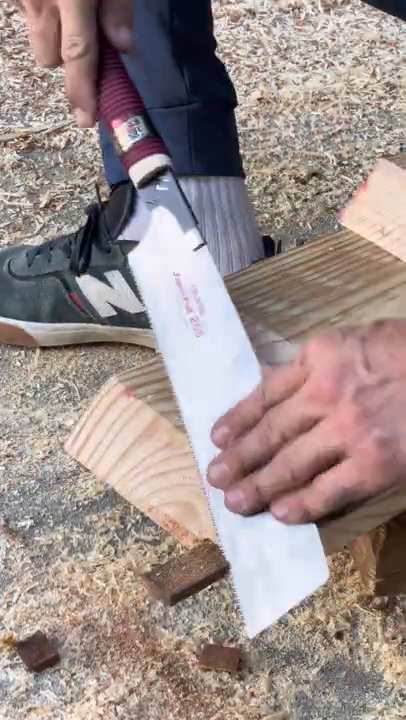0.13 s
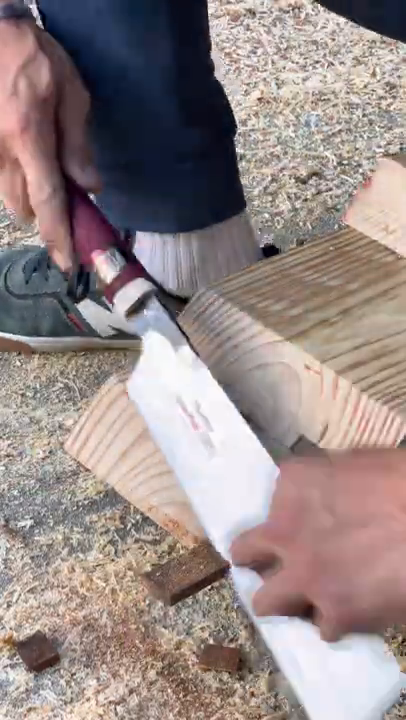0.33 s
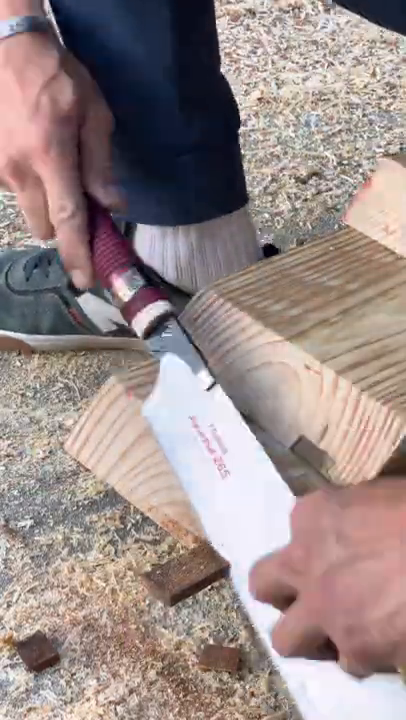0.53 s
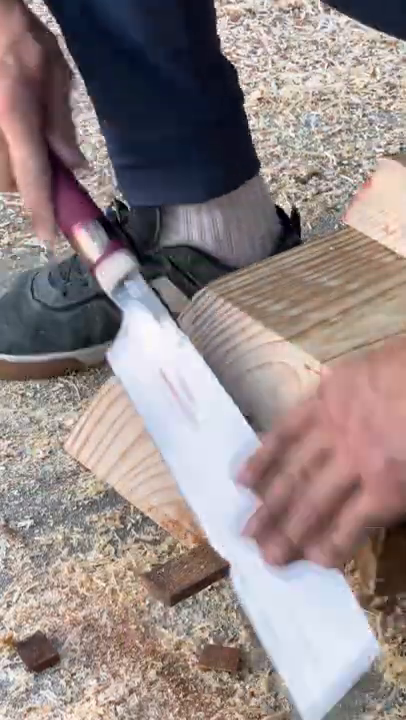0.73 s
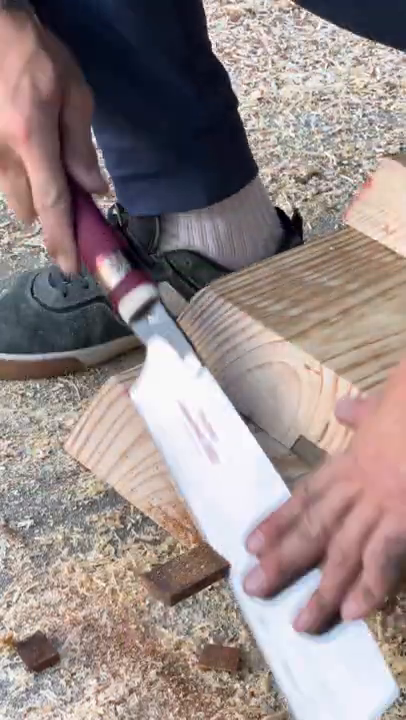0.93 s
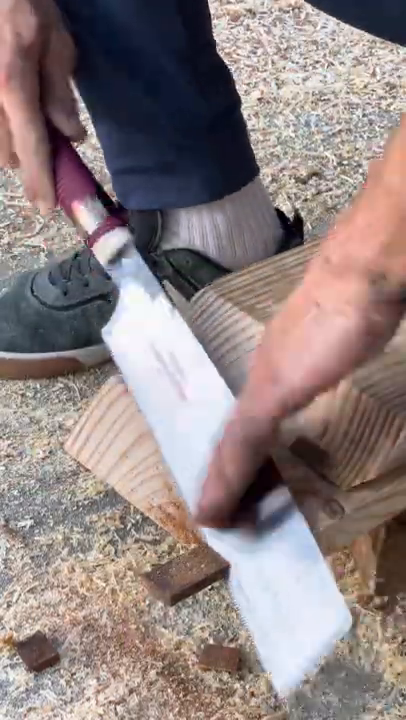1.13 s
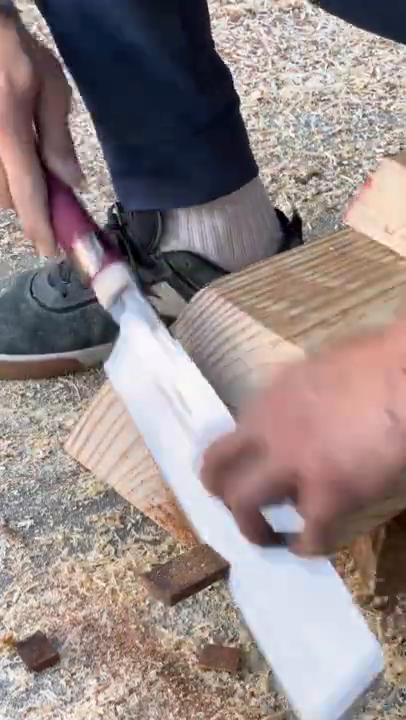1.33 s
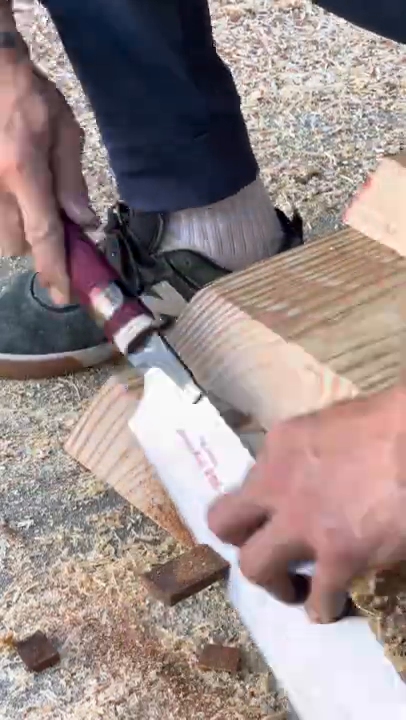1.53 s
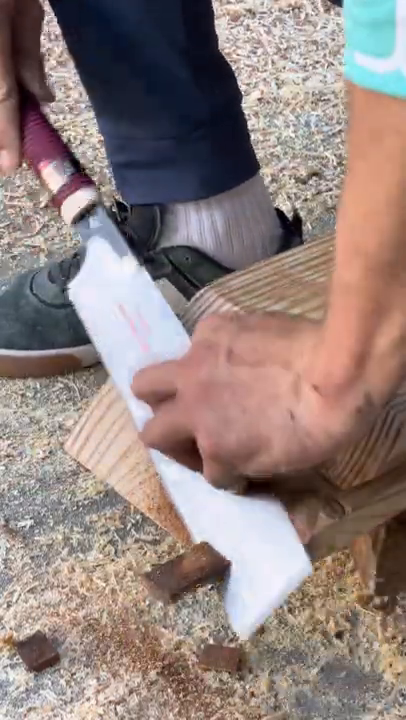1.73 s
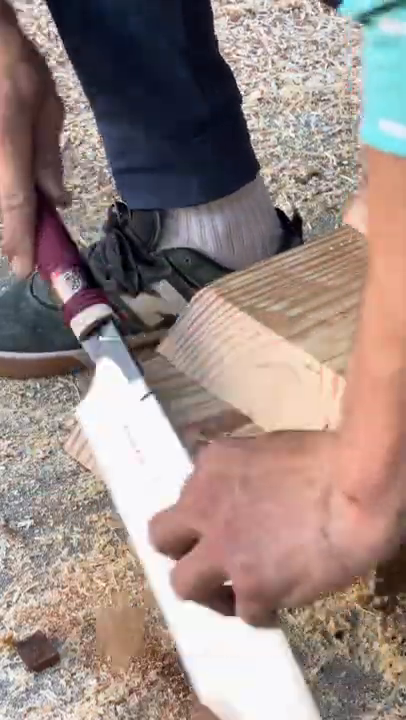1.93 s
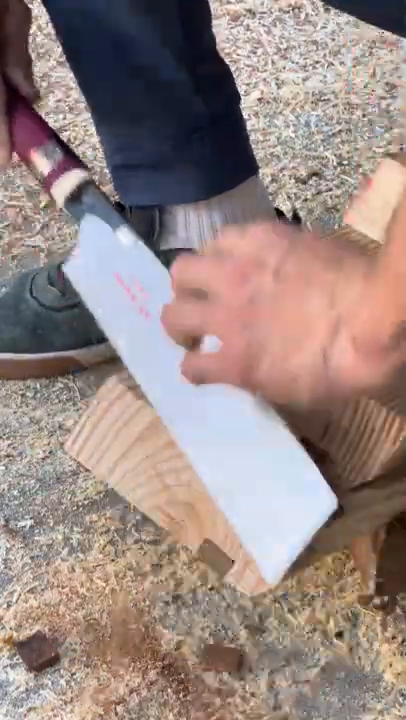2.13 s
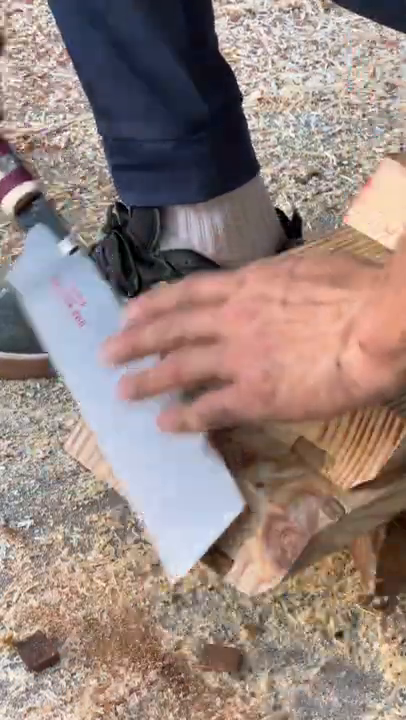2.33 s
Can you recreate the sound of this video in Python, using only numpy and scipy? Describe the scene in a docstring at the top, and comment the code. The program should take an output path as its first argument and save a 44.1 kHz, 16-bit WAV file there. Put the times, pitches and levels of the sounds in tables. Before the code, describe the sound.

Hand saw rasping through wood at sped-up pace, then last slow scrapes, knocks and quiet outdoor hum

```python
"""A fine pull saw rasps through a wooden block outdoors at 5.5 times its speed, quick and high, over raised yard hum.
Early light strokes squeak; in every stroke, random tooth catches make the rasp and ring blade and wood.
At 1.717 s time drops to its natural pace: the last teeth tear free in coarse slips that ring lower modes.
Offcut and blade knock about as short noise bursts, then the blade is set down and its modes rattle.
Shaped noise and two mains tones leave the low hum of the yard, with thin falling whistles far off."""
import sys
import numpy as np
from scipy import signal
from scipy.fft import rfft, irfft
from scipy.io import wavfile

SR = 44100
rng = np.random.default_rng(int(sys.argv[2]) if len(sys.argv) > 2 else 0)


def int16_out(signal):
    """Quantize to a 16-bit WAV file."""
    q = np.round(np.clip(np.atleast_2d(signal).T, -1, 1) * 32767)
    wavfile.write(sys.argv[1], SR, q.astype(np.int16))


N = 110250
T = np.arange(N) / SR   # s

# Half strokes, before the layer gains: [start t/s, length t/s, peak place 0-1, rasp level/dB,
# blade ring level/dB re rasp, wood level/dB re rasp]
HALF_STROKES = [(0.044, 0.14, 0.47, -53.5, -24, -13), (0.16, 0.029, 0.5, -53, 8, -3),
                (0.216, 0.016, 0.4, -42, 3.5, 3), (0.2776, 0.035, 0.24, -47, -4, 13.5),
                (0.331, 0.021, 0.54, -36.5, 4, -1), (0.358, 0.019, 0.5, -37.5, 4.5, -14),
                (0.399, 0.035, 0.85, -41.5, 2, 3.0), (0.4535, 0.026, 0.3, -35.5, 5.5, -8),
                (0.4937, 0.038, 1, -43, 1, 2), (0.557, 0.012, 0.76, -31.5, 4, -9.5),
                (0.6026, 0.021, 0.98, -40.5, 0, 6), (0.6467, 0.024, 0.54, -34.5, 5.5, -9.5),
                (0.6813, 0.033, 0.84, -36, 0, -1), (0.73, 0.025, 0.66, -36.5, 6.5, -6.5),
                (0.77, 0.026, 0.33, -38, 3, 0.5), (0.8067, 0.024, 1, -32, 4, -11.5),
                (0.8486, 0.02, 0.55, -34, 1, -2), (0.886, 0.016, 1, -31.5, 4.5, -5.5),
                (0.921, 0.019, 0.6, -34.5, -2, -0.5), (0.9534, 0.022, 0.6, -34.5, 8.5, -1),
                (0.9916, 0.02, 1, -36, 3, 2.5), (1.027, 0.02, 0.9, -31.5, 8.5, -8),
                (1.066, 0.028, 0, -39.5, 5, 6), (1.1006, 0.019, 0.62, -32, 7, -5.5),
                (1.139, 0.037, 0, -45.5, 6, 0.5), (1.179, 0.019, 0.44, -36, 13.5, -1.5),
                (1.224, 0.018, 0.3, -40.5, 10, 3.5), (1.2564, 0.024, 0.57, -35, 13.5, 0.5),
                (1.2977, 0.018, 0.45, -35, 2, -1), (1.332, 0.019, 0.8, -33.5, 6.5, -4.5),
                (1.373, 0.019, 0.45, -36.5, -1, -3), (1.403, 0.026, 0.53, -33.5, 4, -1.5),
                (1.4426, 0.019, 0.4, -36, -1, 0.5), (1.477, 0.017, 1, -29, 4, -9),
                (1.5133, 0.021, 0.46, -36.5, 7.5, -3.5), (1.549, 0.021, 0.76, -35.5, 8.5, 0),
                (1.583, 0.023, 0.82, -32.5, 2, -3.5), (1.624, 0.018, 0.95, -34.5, 8, -4.5),
                (1.6565, 0.027, 0.55, -31, -1, -2.5), (1.7067, 0.0061, 0.2, -34, 10, -2)]
# Squeaks of the blade: [start t/s, length t/s, f/Hz, base level/dB]
BLADE_SQUEAKS = [(0.162, 0.027, 4560, -50), (0.211, 0.027, 3196, -43), (0.213, 0.038, 4410, -47),
                 (0.293, 0.014, 1710, -57)]
# Colour of the rasp: [f/Hz, relative level/dB]
RASP_COLOUR = [(4000, 0), (5500, -1.5), (7000, 0), (9000, -10), (11000, 2), (13000, -4), (16000, -4)]
# Resonances of blade and wood, before the pace factor:
# [f/Hz, width f/Hz, relative level/dB when fast, relative level/dB at natural pace]
BLADE_MODES = [(1448, 30, 8, -14), (1496, 33, 9, 8), (1655, 105, 7, 1), (2020, 15, -19, -2),
               (2550, 25, -15, 1.5), (2680, 64.5, -23.5, -7), (2875, 95, 0, 5.5)]
WOOD_MODES = [(428, 27, -10, -8.5), (491, 6.2, -0.5, -6), (546.8, 16, 2, -7), (619, 19, 5, -4),
              (650, 54, 1.5, -16), (809, 70, 6, -15)]
# Resonances of the whole block, before the pace factor: [f/Hz, width f/Hz, relative level/dB when fast]
BLOCK_MODES = [(178.4, 15, 3), (227.2, 6.8, -2.5), (302, 43, -5), (340.5, 9.8, 0), (408, 51, 2)]
# Last scraping, before the layer gains: [t/s, ringing level/dB, hiss level/dB]
LAST_LEVELS = [(1.718,-40.5,-49),(1.725,-34,-34.5),(1.74,-33,-35),(1.767,-34.5,-34),(1.778,-36.5,-36),(1.822,-49,-59.5),(1.838,-48,-31.5),(1.852,-39.5,-39),(1.882,-39.5,-44.5),(1.906,-37,-52),(1.94,-59,-63),(1.968,-39.5,-49),(1.99,-57,-87)]
# Hard slips as the last teeth tear free, added to the scraping: [t/s, level/dB re scraping]
LAST_SLIPS = [(1.724, 7), (1.738, 4.5), (1.746, 0), (1.754, 1), (1.763, 0.5)]
# Colours of the last scraping's broad noise and dry hiss: [f/Hz, relative level/dB]
LAST_BROAD_COLOUR = [(300,0),(640,-2),(1300,14),(2730,11),(4500,-4)]
LAST_HISS_COLOUR = [(3500,-6.5),(6300,1.5),(8600,-15),(12000,-3.5),(16000,-1)]
# Sharp ticks, before the band filter: [t/s, burst level/dB, centre f/Hz, 60 dB decay t/s]
SHARP_TICKS = [(1.8462, -16, 1200, 0.045), (1.8894, -16, 3020, 0.023), (1.9635, -38, 2230, 0.02),
               (2.1384, -22.5, 4350, 0.0058)]
# The blade is set down: [t/s, rattle level/dB, 60 dB decay t/s]
SET_DOWN_RATTLES = [(2.1797, -31, 0.11), (2.2165, -31.5, 0.064)]
# Modes of the set-down blade: [f/Hz, relative level/dB, 60 dB decay t/s]
SET_DOWN_BLADE_MODES = [(1107, -5.5, 0.2), (1222, -2, 0.081), (1705, 0.5, 0.022), (2790, -3, 0.033),
                        (3550, -5, 0.042), (4740, -0.5, 0.016), (5250, -3, 0.074), (5470, -3, 0.098)]
# Lower bands of the fast part: [t/s, bass level/dB, middle level/dB, middle's upper edge f/Hz]
LOWER_BAND_LEVELS = [(0,-4,-14,3300),(.035,-10,-36,3320),(.12,-5.5,-14.5,2840),(.15,-18,-24,3280),(.32,-8,-32.5,3230),(.39,-2,-25,700),(.5,2,-1,590),(.545,-16,-24,2350),(.575,-6,-21,2610),(.605,-29,-27,850),(.635,-17,-2,470),(.67,3,25,443)]
# Colours of the fast yard's low noise, middle noise and air: [f/Hz, relative level/dB]
FAST_LOW_COLOUR = [(60, -53), (130, -28.5), (200, -12.5), (260, -6), (330, -3.5), (450, 1.5), (600, -5.5)]
FAST_MID_COLOUR = [(450, -5), (600, 4), (1000, 2), (1500, -1), (2500, -4)]
FAST_AIR_COLOUR = [(1500, -12), (3000, 3), (6000, -5), (10000, -6), (16000, -11)]
# Swell of the fast air: [t/s, level/dB]
FAST_AIR_LEVEL = [(0, -44), (0.038, -67), (.3, -60), (.7, -50.5)]
# Yard noise at natural pace, before waver: [t/s, bass level/dB, middle level/dB]
YARD_LEVELS = [(1.715,-54,-52.5),(1.75,-50,-39.5),(2.0,-44,-51.5),(2.25,-45,-51.5),(2.33,-62.5,-53),(2.42,-54,-64.5),(2.5,-49.5,-65.5)]
# Colours of the natural yard's bass, middle and air: [f/Hz, relative level/dB]
YARD_BASS_COLOUR = [(20, -34), (40, -14), (60, 1), (120, -3), (170, -23)]
YARD_MID_COLOUR = [(130, 6), (200, 0.5), (500, -3.5), (1000, -9), (2000, -20), (3000, -69)]
AIR_COLOUR = [(1500, 5.5), (3000, 5), (5000, 0), (7500, 1.5), (9000, -13), (14000, -5.5), (16000, -20)]
# Thin whistles far off: [start t/s, end t/s, first f/Hz, last f/Hz, base level/dB]
FAR_WHISTLES = [(1.74, 2.147, 3450, 3220, -64), (2.28, 2.613, 3830, 3460, -64.5)]
# Mains tones, before pace factor and waver:
# [f/Hz, level/dB re low yard level when fast, level/dB re yard bass level at natural pace]
MAINS_TONES = [(59.17, -1.5, -3.5), (119.65, 3, -5.5)]
# Phase of left over right: [f/Hz, phase/rad]
STEREO_PHASE = [(100,0.09),(600,-0.52),(2500,-0.24),(3200,0.3),(3700,-0.97),(4100,0.83),(5900,-0.48),(15200,0.17)]
# Level of the stereo difference: [f/Hz, level/dB re middle]
SIDE_LEVEL = [(50, -14), (150, -18.5), (500, -23), (1200, -22), (5000, -7), (9000, -20.5), (14000, -27)]

SPEED_UP, NATURAL_PACE, NATURAL_FROM_S = 5.5, 0.98, 1.717
EDGE_S, STROKE_SHAPE = 0.0041, 1.02
TEETH_PER_S, TEETH_SPREAD_DB, FLUTTER_DB = 9000, 3.15, 0.5
RASP_EDGES_HZ, RASP_PATCH_DB = np.geomspace(5200, 14000, num=6), 3.5   # bands swell on their own
RASP_DB, BLADE_DB, WOOD_DB, BLOCK_DB = -3, -9.5, -1, -7
SQUEAK_WIDTH_HZ = 84
SLIP_T60_S, SLIP_CRACK_DB = 0.038, 10
BLADE_FREE_S, LATE_RING_DB = 1.772, -8.5   # blade leaves the cut; later scraping rings it less
UPPER_FROM_HZ, UPPER_FIRST_DB, UPPER_FREE_DB = 2330, 7.5, -9.5
LAST_TEETH_PER_S, LAST_SPREAD_DB, LAST_BROAD_DB = 3300, 2.4, -3
TICK_SNAP_DB, TICK_BAND_RATIO = 11, 2.2   # first instant over the burst that follows
SET_DOWN_RING_DB = -27
BASS_SPLIT_HZ, EDGE_STEEPNESS = 437, 2.2
FAST_LOW_DB, FAST_MID_DB, YARD_BASS_DB, AIR_DB = -52.5, -50, -3.5, -59.5
WHISTLE_WIDTH_HZ, WHISTLE_STEADY, TRILL_HZ, TRILL_DEPTH = 50, 1.6, 150, 1
HUM_WAVER_DB = 1.2
SIDE_WANDER_PER_S, CUTOFF_HZ = 110, 15900


def fast_strokes():
    """Each half stroke swells and dies with the blade's speed; its catches rasp and ring blade and wood."""
    levels = np.zeros((3, N))
    for start, length, lean, db, *relative in HALF_STROKES:
        end = min(start + length + EDGE_S, NATURAL_FROM_S + EDGE_S)
        peak = start + np.clip(lean, .1, .9) * length
        phase = np.interp(T, [start - EDGE_S, peak, end], [0, .5, 1])
        layer_gains = from_db(db + np.array([0, *relative]))[:, None]
        levels += np.sin(np.pi * phase) ** STROKE_SHAPE * layer_gains
    levels *= from_db(FLUTTER_DB * drift(150)) * (T < NATURAL_FROM_S)
    rasp_level, blade_level, wood_level = levels
    catches = teeth(TEETH_PER_S, TEETH_SPREAD_DB)
    patches = bands(colour(catches, RASP_COLOUR), RASP_EDGES_HZ)
    rasp = rasp_level * sum(from_db(RASP_PATCH_DB * drift(33)) * patch for patch in patches)
    blade = body(blade_level, catches, BLADE_MODES, SPEED_UP, column=2)
    wood = body(wood_level, catches, WOOD_MODES, SPEED_UP, column=2)
    block = body(wood_level, catches, BLOCK_MODES, SPEED_UP, column=2)
    return (from_db(RASP_DB) * rasp + from_db(BLADE_DB) * blade
            + from_db(WOOD_DB) * wood + from_db(BLOCK_DB) * block)


def squeaks():
    """Early light strokes squeak in narrow bands: tones with randomly drifting amplitude and phase."""
    out = np.zeros(N)
    for start, length, hz, db in BLADE_SQUEAKS:
        swell = np.sin(np.pi * np.interp(T, [start, start + length], [0, 1])).clip(0)
        out += from_db(db) * swell * narrow_band(2 * np.pi * hz * T, 1, SQUEAK_WIDTH_HZ)
    return out


def last_scrape():
    """Coarse slips ring blade and wood at their own pitch, over a dry hiss; the upper modes lead and fade."""
    ring, hiss = from_db(in_time(LAST_LEVELS, outside=-120))
    ring = ring * (1 + sum(decay(s, db, SLIP_T60_S) for s, db in LAST_SLIPS))
    catches = teeth(LAST_TEETH_PER_S * from_db(1.5 * drift(130)), LAST_SPREAD_DB)
    catches[(np.array(LAST_SLIPS)[:, 0] * SR).astype(int) + 1] = from_db(SLIP_CRACK_DB)
    struck = ring * from_db(LATE_RING_DB * (T > BLADE_FREE_S))
    ringing = body(struck, catches, BLADE_MODES + WOOD_MODES, NATURAL_PACE, column=3, waver_db=1.5)
    low, high = bands(ringing, [UPPER_FROM_HZ])
    upper_db = np.interp(T, [NATURAL_FROM_S, BLADE_FREE_S], [UPPER_FIRST_DB, UPPER_FREE_DB])
    broad = from_db(LAST_BROAD_DB) * ring * colour(catches, LAST_BROAD_COLOUR)
    dry_hiss = hiss * colour(rms_one(catches) + 0.5 * noise(), LAST_HISS_COLOUR)
    return low + from_db(upper_db) * high + broad + dry_hiss


def knocks():
    """Ticks are short bright bursts; setting the blade down rattles its modes."""
    out, rattle = np.zeros(N), np.zeros(N)
    for s, db, hz, t60 in SHARP_TICKS:
        burst = noise() * decay(s, db, t60)
        burst[int(s * SR) + 1] = from_db(db + TICK_SNAP_DB)
        out += band_pass(burst, hz / TICK_BAND_RATIO, hz * TICK_BAND_RATIO)
    for s, db, t60 in SET_DOWN_RATTLES:
        rattle += rms_one(teeth(LAST_TEETH_PER_S, LAST_SPREAD_DB)) * decay(s, db, t60)
    out += band_pass(rattle, 500, 12000)
    for hz, db, t60 in SET_DOWN_BLADE_MODES:
        r, w = from_db(-60 / (t60 * SR)), 2 * np.pi * hz / SR
        ring = signal.lfilter([0, np.sin(w)], [1, -2 * r * np.cos(w), r * r], rattle + 1e-18)
        out += from_db(db + SET_DOWN_RING_DB) * ring
    return out


def lower_bands(x):
    """Sets the level of the bass and of the middle up to a sliding edge."""
    low_db, mid_db, edge_hz = in_time(LOWER_BAND_LEVELS)
    edges = np.geomspace(BASS_SPLIT_HZ, 4000, 11)
    low, *middle, top = bands(x, edges)
    out = from_db(low_db) * low + top
    for hz, part in zip(np.sqrt(edges[1:] * edges[:-1]), middle):
        share = np.clip(.5 + EDGE_STEEPNESS * np.log2(edge_hz / hz), 0, 1)
        out += from_db(mid_db * share) * part
    return out


def fast_yard():
    """Distant traffic-like noise and mains hum, raised in pitch."""
    low = colour(noise(), FAST_LOW_COLOUR) + hum(SPEED_UP, column=1)
    return from_db(FAST_LOW_DB) * low + from_db(FAST_MID_DB) * colour(noise(), FAST_MID_COLOUR)


def fast_air():
    """Thin open-air hiss, raised in pitch, from shaped noise."""
    return from_db(in_time(FAST_AIR_LEVEL)[0]) * colour(noise(), FAST_AIR_COLOUR)


def yard():
    """Noise and hum at natural pace, wavering together, under steady air hiss and far whistles."""
    bass_level, mid_level = from_db(in_time(YARD_LEVELS))
    bass = from_db(YARD_BASS_DB) * colour(noise(), YARD_BASS_COLOUR) + hum(NATURAL_PACE, column=2)
    ground = bass_level * bass + mid_level * colour(noise(), YARD_MID_COLOUR)
    air = from_db(AIR_DB) * colour(noise(), AIR_COLOUR)
    return from_db(1.26 * drift(8.8)) * ground + air + whistles()


def whistles():
    """Thin falling tones, blurred into narrow bands and trilled in level."""
    out = np.zeros(N)
    trill = 1 + TRILL_DEPTH * np.sin(2 * np.pi * TRILL_HZ * T)
    for start, end, from_hz, to_hz, db in FAR_WHISTLES:
        swell = np.sin(np.pi * np.interp(T, [start, end], [0, 1])).clip(0) ** 0.4
        turn = 2 * np.pi * np.cumsum(np.interp(T, [start, end], [from_hz, to_hz])) / SR
        out += from_db(db) * swell * trill * narrow_band(turn, WHISTLE_STEADY, WHISTLE_WIDTH_HZ)
    return out


def hum(speed, column):
    """Two mains tones whose level wavers."""
    out = np.zeros(N)
    for row in MAINS_TONES:
        level = from_db(row[column] + HUM_WAVER_DB * drift(1.06 * speed))
        out += level * np.sin(2 * np.pi * row[0] * speed * T)
    return out


def teeth(per_s, spread_db):
    """Teeth catch at random with uneven force, as impulses of either sign."""
    caught = rng.random(N) < per_s / SR
    force = from_db(spread_db * np.minimum(rng.exponential(1, N), 4))
    return caught * force * rng.choice([-1, 1], N)


def body(envelope, catches, modes, speed, column, waver_db=3.5):
    """The catches, under the envelope, ring a set of resonances whose drive wavers."""
    out = 0
    for k, row in enumerate(modes):
        r, w = np.exp(-np.pi * row[1] * speed / SR), 2 * np.pi * row[0] * speed / SR
        gain = np.sqrt(2 * (1 - r * r)) * from_db(row[column] + waver_db * drift(21.6)) * (-1) ** k
        drive = gain * envelope * rms_one(catches) + 1e-18
        out = out + signal.lfilter([.5, 0, -.5], [1, -2 * r * np.cos(w), r * r], drive)
    return out / np.sqrt(np.sum(from_db(np.array(modes)[:, column]) ** 2))


def narrow_band(turn, steady, width_hz):
    """A tone of the given phase plus slow random sine and cosine parts that widen it."""
    return (steady + drift(width_hz)) * np.sin(turn) + drift(width_hz) * np.cos(turn)


def decay(start, db, t60):
    """Silent until start, then falls from db by 60 dB in t60 seconds."""
    return (T >= start) * from_db(db - 60 * np.maximum(T - start, 0) / t60)


def band_pass(x, low_hz, high_hz):
    """Keeps the band between two frequencies."""
    return signal.sosfilt(signal.butter(2, [low_hz, high_hz], "band", fs=SR, output="sos"), x + 1e-18)


def bands(x, edges_hz):
    """Splits x at the edges; the parts add up to x."""
    hz, spectrum = np.fft.rfftfreq(N, 1 / SR), rfft(x)
    below = [irfft(spectrum / (1 + (hz / edge) ** 16), N) for edge in edges_hz]
    return np.diff([0 * x, *below, x], axis=0)


def colour(x, spectrum):
    """Gives x the spectrum, falling 40 dB more per octave outside it; rms 1."""
    db, hz = at_hz(spectrum)
    octaves_out = np.maximum(np.log2(spectrum[0][0] / hz), np.log2(hz / spectrum[-1][0]))
    return rms_one(irfft(rfft(x) * from_db(db - 40 * np.maximum(0, octaves_out)), N))


def drift(rate):
    """Smooth random wander of rms 1: noise through a two-pole low-pass at rate Hz."""
    r = np.exp(-2 * np.pi * rate / SR)
    return rms_one(signal.lfilter([1], [1, -2 * r, r * r], rng.standard_normal(N + SR))[SR:])


def noise():
    """White noise."""
    return rng.standard_normal(N)


def in_time(rows, outside=None):
    """Draws each column as a line over time."""
    s, *columns = np.transpose(rows)
    return [np.interp(T, s, c, left=outside, right=outside) for c in columns]


def at_hz(points):
    """Draws a curve over log frequency; also returns the frequencies."""
    hz = np.maximum(np.fft.rfftfreq(N, 1 / SR), 1)
    points_hz, values = np.array(points).T
    return np.interp(np.log(hz), np.log(points_hz), values), hz


def from_db(db):
    """Decibels to amplitude."""
    return 10 ** (np.asarray(db) / 20)


def rms_one(x):
    """Scales x to rms 1."""
    return x / np.sqrt(np.mean(x ** 2) + 1e-20)


def scene():
    """Crossfades from fast to natural pace in 2 ms, adds scrape and knocks, and spreads it in stereo."""
    natural = np.clip((T - NATURAL_FROM_S) / .002, 0, 1)
    fast = lower_bands(fast_strokes() + fast_yard()) + fast_air() + squeaks()
    mid = (1 - natural) * fast + natural * yard() + last_scrape() + knocks()
    side = rfft(mid * drift(SIDE_WANDER_PER_S)) * from_db(at_hz(SIDE_LEVEL)[0])
    turn = np.exp(.5j * at_hz(STEREO_PHASE)[0])   # half the phase to each side
    return np.array([irfft(rfft(mid) * turn + side, N), irfft(rfft(mid) / turn - side, N)])


def record(dry):
    """The top is cut by a steep low-pass."""
    return signal.sosfilt(signal.cheby2(22, 80, CUTOFF_HZ + 450, fs=SR, output="sos"), dry)


dry = scene()
out = record(dry)
int16_out(out)
```